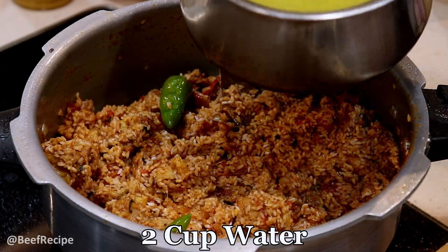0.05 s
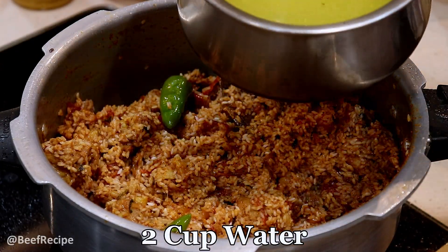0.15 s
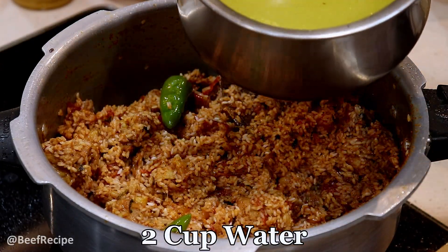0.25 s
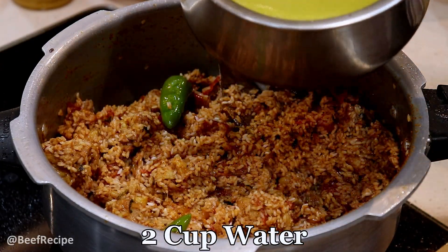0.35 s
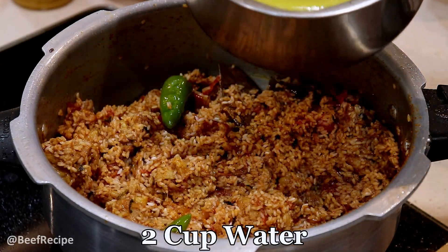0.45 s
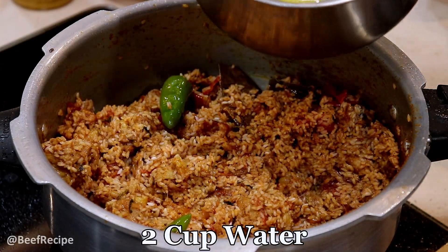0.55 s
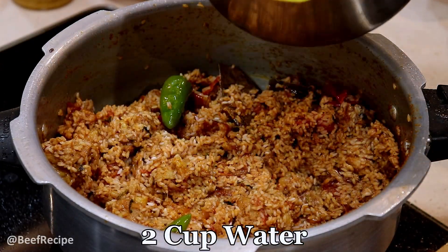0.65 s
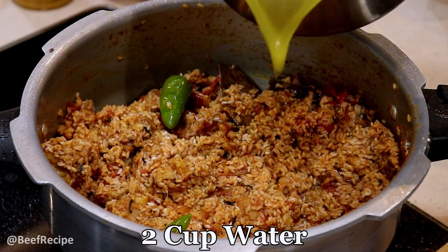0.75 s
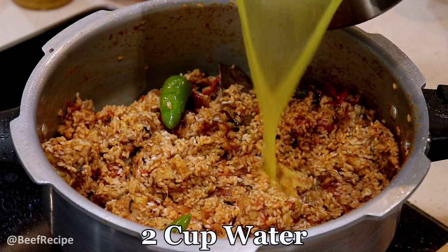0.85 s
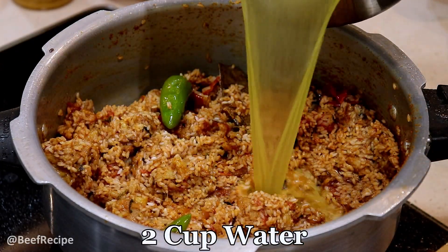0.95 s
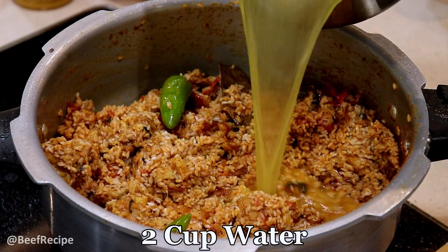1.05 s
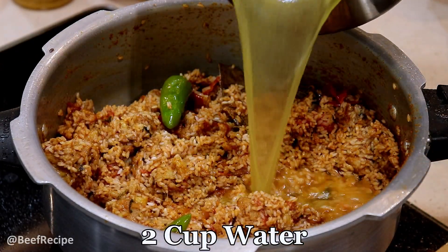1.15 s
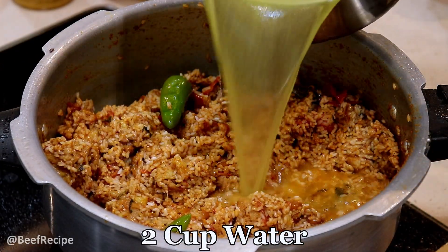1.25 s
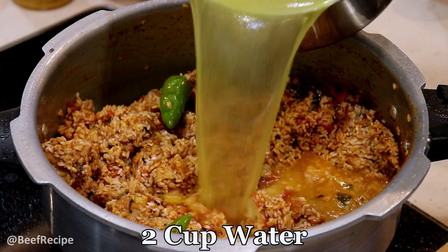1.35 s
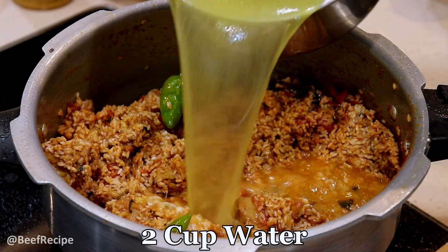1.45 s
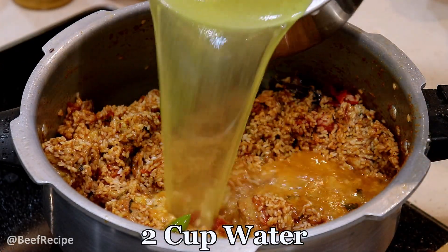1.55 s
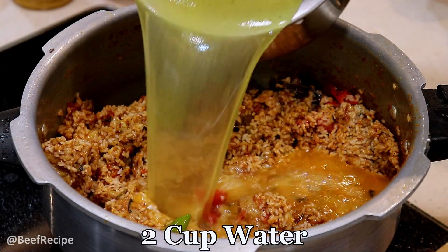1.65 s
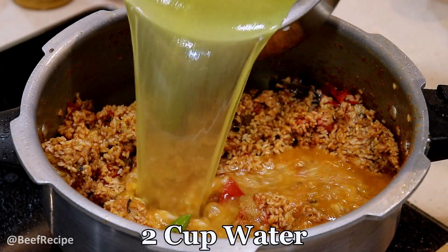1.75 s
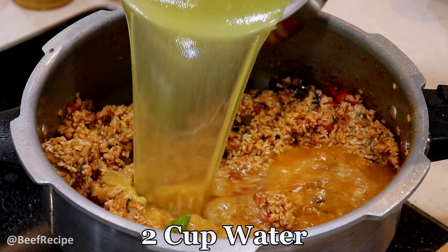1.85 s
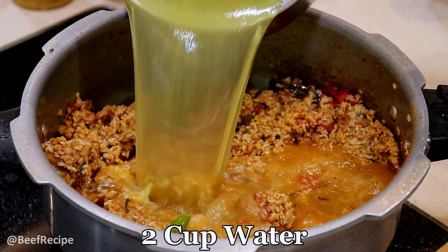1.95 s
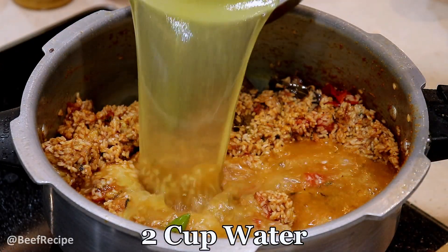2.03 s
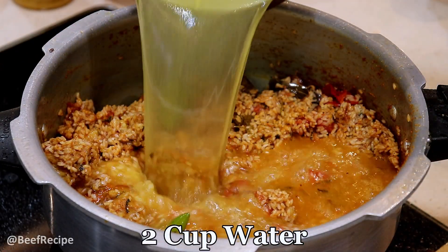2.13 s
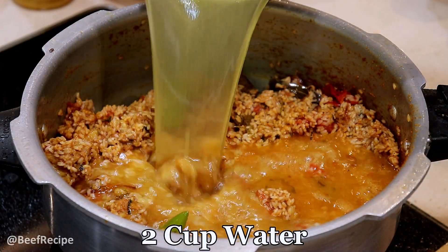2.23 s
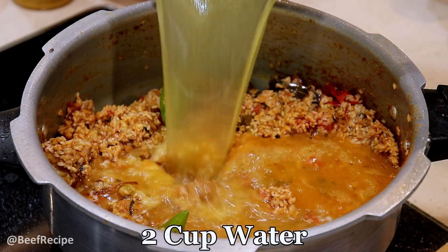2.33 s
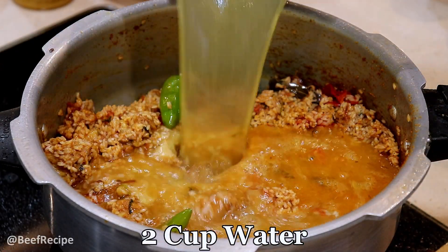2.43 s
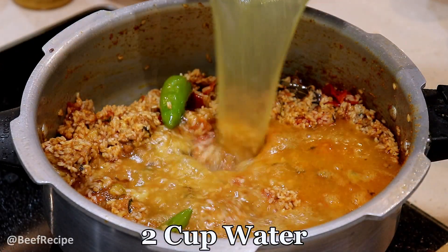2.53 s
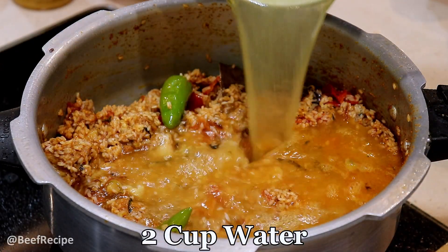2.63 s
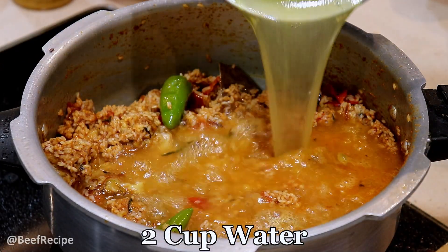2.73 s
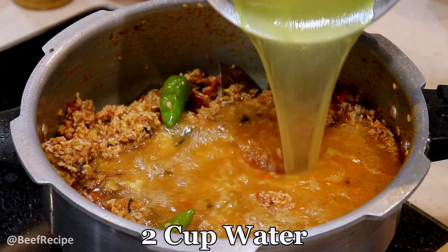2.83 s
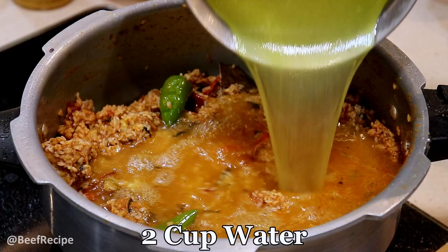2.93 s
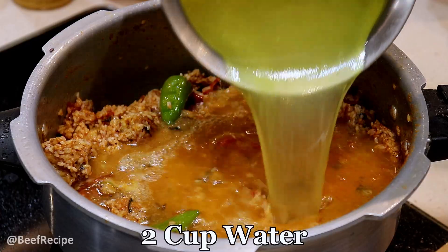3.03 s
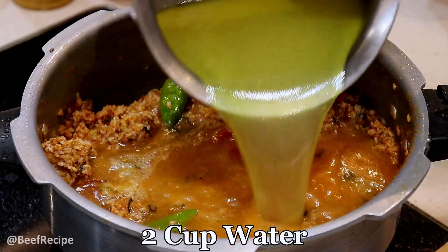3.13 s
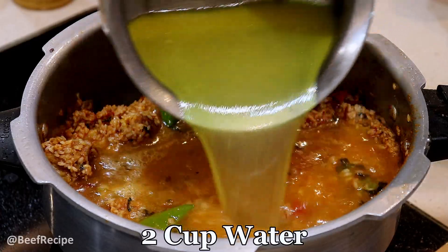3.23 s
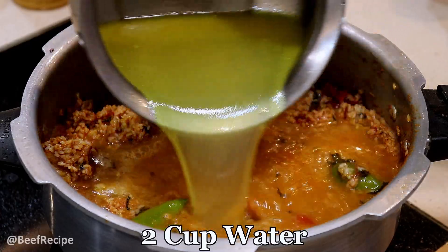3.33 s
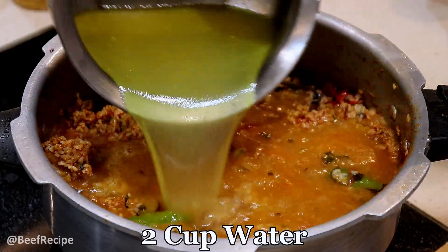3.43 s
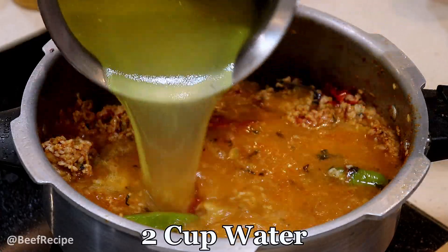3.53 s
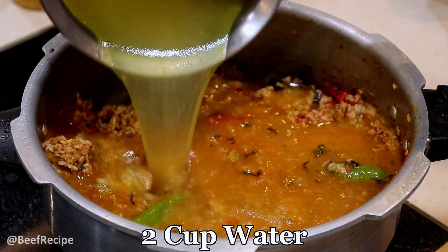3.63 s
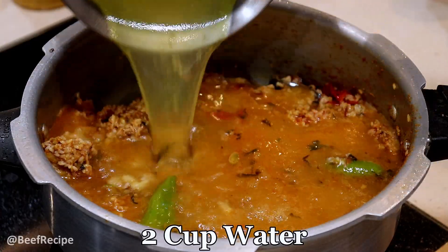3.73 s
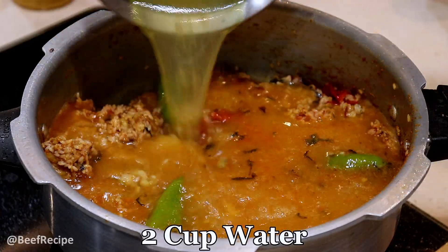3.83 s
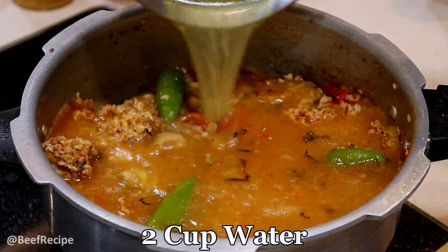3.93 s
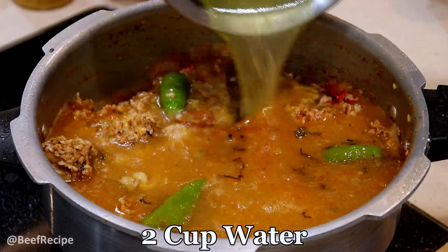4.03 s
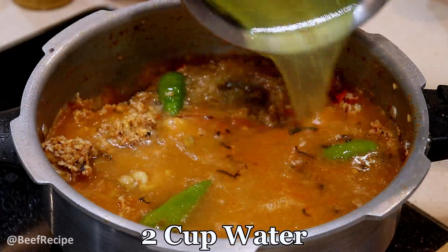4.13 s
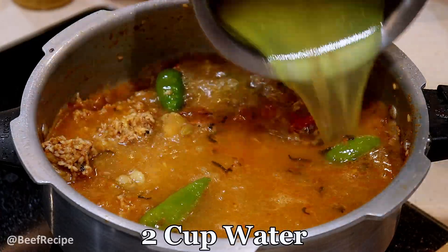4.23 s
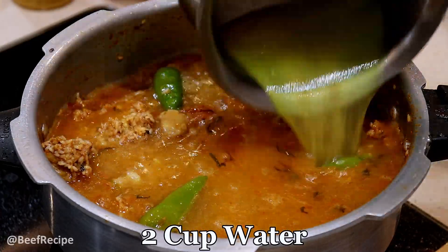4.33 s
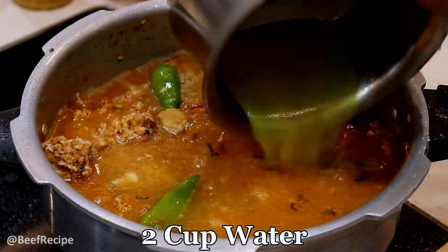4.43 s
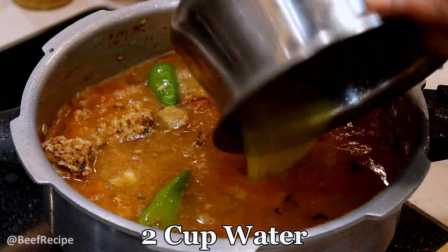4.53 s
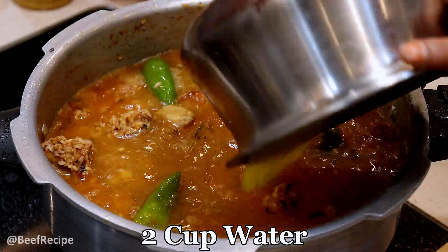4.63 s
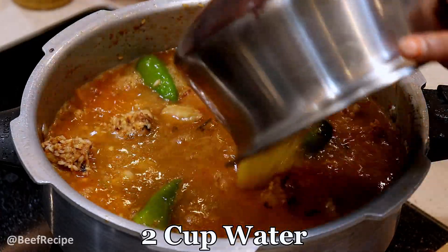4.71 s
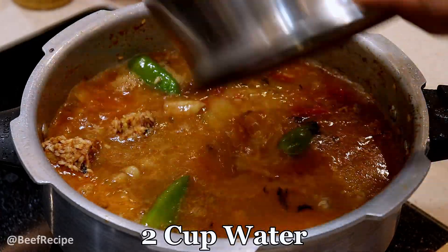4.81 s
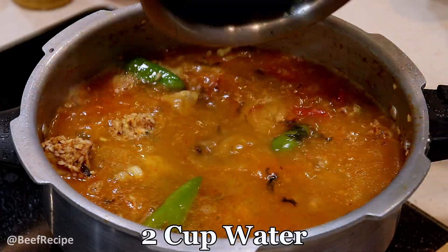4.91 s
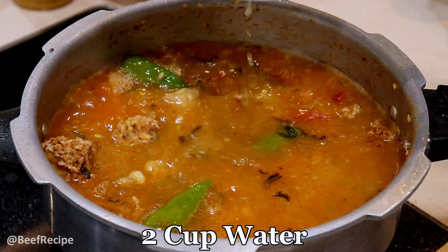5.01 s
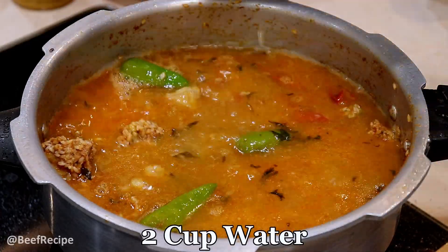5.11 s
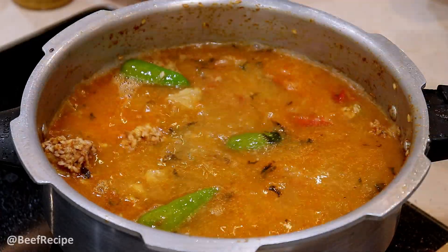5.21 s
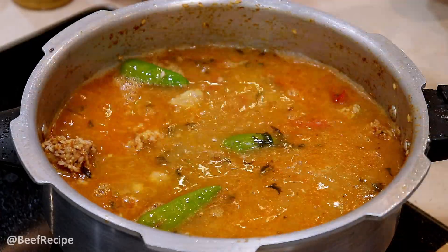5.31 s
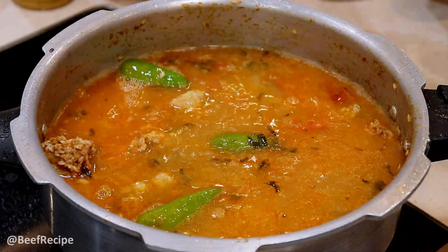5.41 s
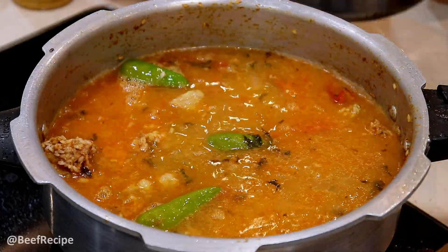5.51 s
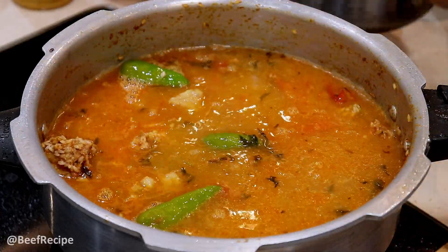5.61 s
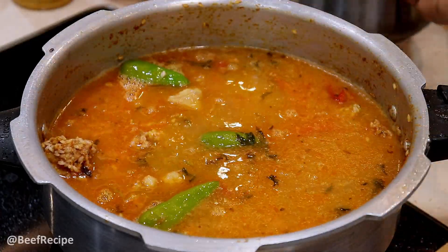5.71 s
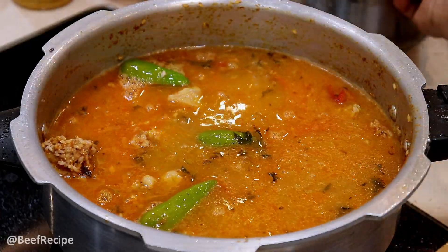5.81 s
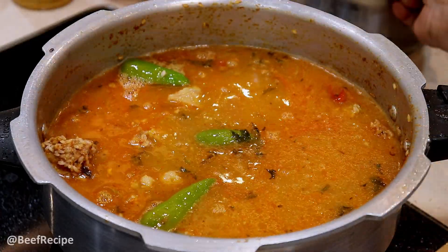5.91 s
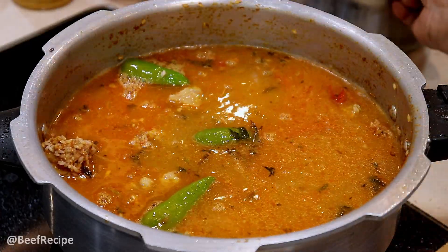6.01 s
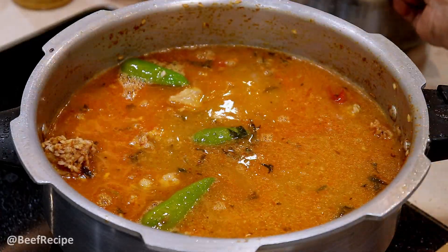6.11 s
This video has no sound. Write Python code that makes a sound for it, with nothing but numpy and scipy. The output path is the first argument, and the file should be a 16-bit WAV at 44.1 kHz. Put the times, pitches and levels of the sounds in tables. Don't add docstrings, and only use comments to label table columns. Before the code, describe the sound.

Close, centred sound of liquid poured from a steel bowl into a metal pot in a small hard-walled kitchen. Low room air and fan hum lie underneath. After one dry tick, a trickle grows into a rushing, bubbly stream with shifting hollow, singing tones and bright spits of spray, strongest past the middle. The flow dwindles to soft bubbling, then the bowl is set down with a short clear metallic ring and dull thump.

```python
import sys
import numpy as np
from scipy import signal
from scipy.fft import rfft, irfft, next_fast_len
from scipy.io import wavfile
from scipy.ndimage import uniform_filter1d

SR = 44100
rng = np.random.default_rng(int(sys.argv[2]) if len(sys.argv) > 2 else 0)


def makeup_ratio(level_db):
    decades = np.asarray(level_db, float) / 20
    return 10 ** decades


def store_pcm(level_fs):
    pcm = np.round(np.clip(level_fs, -1, 1) * 32767).astype(np.int16)
    wavfile.write(sys.argv[1], SR, np.atleast_2d(pcm).T)


N = 271788


def evened(x):
    return x / np.sqrt(np.mean(x ** 2) + 1e-20)


def seconds(count=N):
    return np.arange(count) / SR


def curve(rows):
    s, *columns = np.transpose(rows)
    return [np.interp(seconds(), s, column) for column in columns]


def coloured(x, points):
    f, db = np.transpose(points)
    size = next_fast_len(len(x))
    hz = np.fft.rfftfreq(size, 1 / SR)
    gain = makeup_ratio(np.interp(np.log(hz + 1), np.log(f + 1), db))
    return irfft(rfft(x, size) * gain, size)[:len(x)]


def resonate(x, hz, width_hz, order=1):
    turn = np.exp(2j * np.pi * np.cumsum(hz * np.ones(len(x))) / SR)
    r = np.exp(-np.pi * width_hz / SR)
    low = x * turn.conj()
    for _ in range(order):
        low = signal.lfilter([1 - r], [1, -r], low)
    return 2 * (turn * low).real


def narrow(x, hz, width_hz):
    return resonate(x, hz, 1.26 * width_hz, order=2)


def drift(per_s):
    steps_per_s = 400
    steps = rng.standard_normal(int(N / SR * steps_per_s) + 2)
    steps = uniform_filter1d(steps, max(int(steps_per_s / per_s), 1))
    return np.interp(seconds() * steps_per_s, np.arange(len(steps)), evened(steps))


def add(mix, s, sound):
    part = mix[round(s * SR):][:len(sound)]
    part += sound[:len(part)]


def patchy(x, patch_db, flicker_db):
    z = signal.stft(x, nperseg=256, noverlap=192)[2]
    a, b = rng.standard_normal((z.shape[1], z.shape[0], 2)).T
    patches = evened(uniform_filter1d(uniform_filter1d(a, size=4, axis=0), size=40, axis=1))
    flicker = evened(uniform_filter1d(uniform_filter1d(b, size=50, axis=0), size=12, axis=1))
    z = z * makeup_ratio(patch_db * patches + flicker_db * flicker)
    return signal.istft(z, nperseg=256, noverlap=192)[1][:N]


# (frequency [Hz], density [dB per Hz])
ROOM_COLOUR = [(15, -73), (25, -31), (72, -22), (222, -8.5), (299, -9), (333, -11.5), (403, -11),
               (527, -13), (572, -10), (729, -15), (791, -13.5), (1680, -16), (1930, -21), (3390, -19),
               (15800, -31)]
# (frequency [Hz], level [dB])
FAN = [(80.7, -72), (301.5, -67), (398.4, -48), (791.3, -60)]


def kitchen():
    room_db = -42 - 1.47
    air = makeup_ratio(room_db) * evened(coloured(patchy(rng.standard_normal(N), 1.0, 0.11), ROOM_COLOUR))
    t = seconds()
    tones = 0
    for hz, db in FAN:
        level = makeup_ratio(db - 1 + 0.59 * drift(6.1))
        tones = tones + level * np.sin(2 * np.pi * hz * t + 0.21 * drift(1.7))
    return air + tones


def channel_hiss():
    colour = [(20, 1), (120, -15), (400, -25.5), (1000, -43), (9000, -41.0), (14000, -23)]
    return makeup_ratio(-69.0) * evened(coloured(rng.standard_normal(N), colour))


# (time [s], low edge [Hz], high edge [Hz])
WIDE_PATCHES = [(.09, 7600, 9000), (.23, 6300, 7600), (.44, 5200, 6300), (1.3, 6300, 7600),
                (2.9, 5600, 7000), (2.9, 13100, 15100), (3.41, 6300, 7600), (3.5, 7600, 9000),
                (3.5, 4200, 5200), (3.85, 4200, 5200), (3.96, 4200, 5200), (4.36, 11100, 12400),
                (4.89, 6300, 9700), (4.89, 4200, 5200)]


def wide_patches(limited):
    side = np.zeros(N)
    size, lead_s = 1536, .017
    hz = np.fft.rfftfreq(size, 1 / SR)
    for s, low_hz, high_hz in WIDE_PATCHES:
        part = limited[0, round((s - lead_s) * SR):][:size]
        level = abs(rfft(part)) * (hz > low_hz) * (hz < high_hz)
        noise = irfft(level * np.exp(2j * np.pi * rng.random(len(hz))))
        add(side, s - lead_s, makeup_ratio(-3.0) * noise * signal.windows.tukey(size, .7))
    return side


# (time [s], peak level [dB], frequency [Hz], breadth [Hz])
TICKS = [
    (0.2538, -14, 6500, 4900),
    (0.2563, -25, 9000, 5940),
    (0.262, -27, 6500, 4000),
    (.2705, -35, 6000, 4000),
]


def ticks():
    out = np.zeros(N)
    for s, db, hz, breadth_hz in TICKS:
        snap = narrow(signal.unit_impulse(200), hz, breadth_hz)
        add(out, s, makeup_ratio(db) * snap / abs(snap).max())
    return out


# (time [s], peak level [dB], frequency [Hz], breadth [Hz])
SPLASHES = [(.3875, -33, 3900, 1500), (.654, -37, 9000, 5000), (.7394, -37, 8000, 4000),
            (1.015, -36, 2720, 300), (1.04, -30.5, 7000, 2500), (1.1169, -29, 6200, 2000),
            (1.1543, -30, 5700, 900), (1.1784, -31, 4600, 900), (1.1974, -25, 5900, 1200),
            (1.1995, -27, 10500, 5000), (1.2644, -30, 8000, 4040), (1.317, -25, 2160, 350),
            (1.3295, -27, 4340, 900), (1.345, -20.5, 5700, 900), (1.367, -27, 3700, 1000),
            (1.375, -25, 10000, 5000), (1.4194, -22, 3600, 1000), (1.4994, -27, 3280, 1210),
            (3.0144, -22, 2570, 348), (3.05, -23, 6800, 920), (3.0894, -16, 6900, 900),
            (3.183, -21, 2730, 450), (3.191, -14, 5200, 1100), (3.198, -16, 8000, 4000),
            (3.389, -17, 4400, 450), (3.414, -14.5, 4230, 450), (4.108, -12, 2800, 600),
            (4.197, -19, 2850, 600), (5.16, -22, 5450, 2500)]
# (time [s], peak level [dB], frequency [Hz])
SPITS = [(1.4444, -15, 5910), (1.4964, -24, 6560), (1.5374, -25, 5890), (1.5754, -32, 7850),
         (1.6194, -23, 6910), (1.6794, -23, 5320), (1.8494, -28, 6700), (1.938, -17, 6420),
         (2.0294, -17.5, 6410), (2.2558, -22, 6040), (3.6684, -19, 6630), (3.7648, -11, 6220),
         (3.8294, -11, 6250), (3.9954, -10, 6540), (4.0284, -2.5, 5440), (4.1464, -1.5, 5440),
         (4.2394, -7, 7180), (4.2874, -9, 5920), (4.9724, -22, 5340)]
# (time [s], level [dB], frequency [Hz], breadth [Hz])
BOOMS = [
    (5.999, -24.5, 161, 70),
    (6.09, -29, 125, 60),
]


def splashes():
    out, t = np.zeros(N), seconds(5000)
    spits = [(s, db - 3.5, hz, 0.37 * hz) for s, db, hz in SPITS]
    for s, db, hz, breadth_hz in SPLASHES + BOOMS + spits:
        burst = evened(narrow(rng.standard_normal(len(t)), hz, breadth_hz))
        t60 = 0.062 + 7.5 / breadth_hz
        attack = 1 - np.exp(-t / 0.00022)
        add(out, s, makeup_ratio(db - 8.0 - 60 * t / t60) * attack * burst)
    return out


def trickle():
    from_s, to_s, rise_s = .78, 1.086, 0.037
    t = seconds()
    gate = np.clip(np.minimum(t - from_s, to_s - t) / rise_s, 0, 1)
    level = makeup_ratio(-45.5 - 12 * (t - from_s))
    drops = rng.standard_normal(N) * makeup_ratio(1.5 * drift(60.))
    return gate * level * evened(resonate(drops, 1470, 310.0, order=2))


def bubbles(per_s, cycles, spread_db, rise, count=36):
    size = makeup_ratio(spread_db * np.minimum(rng.exponential(1, N), 5)) * rng.choice([-1, 1], N)
    kind = np.floor(rng.random(N) * SR / per_s * count)
    out = np.zeros(N)
    for k, hz in enumerate(np.linspace(300, 15000, count)):
        u = np.arange(0, 5 * cycles, hz / SR)
        tone = np.sin(2 * np.pi * u * (1 + rise * u / cycles))
        ring = tone * (1 - np.exp(-u)) * np.exp(-u / cycles)
        out += signal.oaconvolve(size * (kind == k), ring / np.linalg.norm(ring))[:N]
    return evened(out)


# (frequency [Hz], density [dB per Hz])
WATER_COLOUR = [(24, -67), (40, -52), (133, -2.5), (219, -10.5), (390, -2), (611, -7.5), (868, -1.5),
                (1170, -6.5), (1260, -1.5), (2080, -4.5), (2740, -2.5), (3190, -3.5), (7280, -0.5),
                (11100, -3), (15800, -13.5)]
# (frequency [Hz], width [Hz], level [dB])
POT_TONES = [(428, 138, 0), (895, 300, -15), (1500, 960, -30), (2850, 1540, -3.5), (3600, 1160, -3),
             (4430, 270, -4), (5560, 2700, -1), (6600, 740, -10), (8280, 220, -3)]


def water_in_pot():
    fizz = bubbles(9000, cycles=9, spread_db=3.2, rise=.03)
    water = coloured(patchy(fizz * .5 + rng.standard_normal(N), 1.2, .8), WATER_COLOUR)
    tones = sum(makeup_ratio(db + 2.2 * drift(8.6)) * resonate(water, hz, w) for hz, w, db in POT_TONES)
    return water + tones


PARTS_HZ = [700, 2200, 7000]
# (time [s], force of the fall [dB], spray thrown up [dB re force])
FLOW = [(.98, -46, -8), (1.15, -41, -10), (1.33, -36, -12), (1.36, -34.5, -2), (1.77, -28.5, -7),
        (1.85, -33, -6.5), (2.23, -31.5, -6), (2.43, -25, -5), (2.74, -25.5, -11), (2.86, -29.5, -11),
        (3.14, -29.5, -4.5), (3.72, -24, -11), (3.78, -20.5, -5), (4.1, -19.5, -1.5), (4.3, -20, -4.5),
        (4.44, -26.5, -7.5), (5.45, -36, -4.5), (5.9, -44, -3)]


def stream():
    size = next_fast_len(N)
    spectrum, hz = rfft(water_in_pot(), size), np.fft.rfftfreq(size, 1 / SR)
    steps = [1 / (1 + (hz / edge) ** 6) for edge in PARTS_HZ]
    masks = np.diff([0 * hz, *steps, 1 + 0 * hz], axis=0)
    t = seconds()
    force_db, spray_db = curve(FLOW)
    swing_db = force_db + 28
    gurgle_db = -46 + 0.28 * swing_db + 0.88 * t
    splash_db = -35 + 0.79 * swing_db
    levels = gurgle_db, splash_db, force_db, force_db + spray_db
    parts = [evened(irfft(spectrum * mask, size)[:N]) for mask in masks]
    start = np.clip((t - 0.83) / 0.35, 0, 1)
    flow = start * sum(makeup_ratio(db) * part for db, part in zip(levels, parts))
    return makeup_ratio(-3.0) * flow + hollows(flow)


# (start [s], end [s], frequency [Hz], level [dB])
HOLLOWS = [(.98, 1, 2500, -8), (1.1, 1.6, 3520, -0.5), (1.5, 1.86, 3500, -2), (1.27, 1.1, 2500, -9),
           (1.4, 1.45, 9000, 5), (1.7, 1.9, 5100, 1), (2.4, 2.73, 3430, -2), (2.28, 2.53, 2700, 2.5),
           (2.58, 2.7, 4250, 1), (2.7, 2.8, 6270, -4), (2.96, 3.3, 2660, -1), (3.1, 3.08, 6200, -4),
           (2.3, 3.4, 810, -7), (3.18, 3.55, 3540, 3), (3.05, 3.3, 4470, 1.5), (3.45, 4.5, 1590, -16),
           (3.6, 4.8, 2800, -5), (3.98, 4, 5800, 1), (3.6, 5.6, 930, -4), (3.97, 4.2, 7500, 1),
           (4.2, 6.4, 2880, -6), (4.75, 5.25, 5600, -10), (4.35, 4.65, 3500, -6), (2.4, 3.67, 400, -2),
           (3.55, 3.9, 1070, -2), (1.1, 1.1, 9300, 0), (4.6, 5.8, 390, -9.5)]


def hollows(flow):
    out = np.zeros(N)
    wander, beads = drift(7.9), drift(40.)
    for s, end, hz, db in HOLLOWS:
        part = flow[round(s * SR):round(end * SR)]
        first = round(s * 3000)
        shape = slice(first, first + len(part))
        tone = narrow(part, hz * (1 + .008 * wander[shape]), 90 + .042 * hz)
        level = makeup_ratio(db + 2.5 * beads[shape] * .85)
        add(out, s, level * tone * signal.windows.tukey(len(part), .5))
    return out


# (frequency [Hz], level [dB], t60 [s])
BOWL_MODES = [(170, -21, .5), (398, -21, .7), (660, -15, .06), (720, -9, .06), (790, -7, .06),
              (870, -8, .07), (930, -12, .17), (967, -15, .2), (997, -10, .3), (1020, 0, .46),
              (1058, -18, .2), (1105, -17, .12), (1421, -19, .6), (1437, -19, .6), (1777, -30, .3),
              (2151, -27, .3), (2389, -19, .22), (2428, -11, .26), (2483, -13, .24), (3168, -21, .28),
              (3195, -26, .25), (4581, -25, .28), (5250, -21, .045), (5712, -27, .15), (5900, -26, .05),
              (6643, -32, .15), (6950, -23, .05), (7494, -30, .12), (8323, -33, .1)]
# (time [s], level [dB], hardness [dB per octave], share of free ringing time [1])
TOUCHES = [
    (5.9858, -19, -6., .03),
    (5.9897, -16.5, 1.2, 1.6),
    (6.028, -35, 3., .4),
    (6.092, -34, 6., .25),
]


def bowl():
    out, t = np.zeros(N), seconds(9000)
    for s, db, hard_db, free in TOUCHES:
        ring = 0
        for hz, mode_db, t60 in BOWL_MODES:
            level = makeup_ratio(mode_db + hard_db * np.log2(hz / 1000) - 60 * t / t60 / free)
            ring = ring + level * np.sin(2 * np.pi * hz * t)
        grit = evened(narrow(rng.standard_normal(len(t)), 5500, 3500.))
        scrape = makeup_ratio(-23 + 3.2 * hard_db - 60 * t / .09) * grit
        add(out, s, makeup_ratio(db) * (ring + scrape) * (1 - np.exp(-t / .0015)))
    grip_s, close_s, grip_db = 6.103, .006, -4
    return out * makeup_ratio(grip_db * np.clip((seconds() - grip_s) / close_s, 0, 1))


def room(x):
    t = seconds(12000)
    hits = (rng.random(len(t)) < .045) * rng.choice([-1, 1], len(t))
    taps = hits * makeup_ratio(-60 * t / 0.9) * (t > .003)
    return signal.oaconvolve(x, taps / np.linalg.norm(taps))[:N]


def scene():
    wet, ringing = splashes() + ticks(), bowl()
    mono = kitchen() + trickle() + stream()
    mono += wet + makeup_ratio(-6.5) * room(wet)
    mono += ringing + makeup_ratio(-17) * room(ringing)
    hiss = channel_hiss()
    return np.array([mono + hiss, mono - hiss])


def top_cut(x):
    return signal.sosfilt(signal.butter(12, 16520, fs=SR, output="sos"), x)


def record(dry):
    lowpass = signal.firwin(511, 15750, window=("kaiser", 9), fs=SR)
    limited = signal.oaconvolve(dry, lowpass[None], "same")
    limited = signal.sosfilt(signal.butter(2, 45, "high", fs=SR, output="sos"), limited)
    side = wide_patches(limited)
    return top_cut(limited + np.array([side, -side]))


dry = scene()
out = record(dry)
store_pcm(out)
```